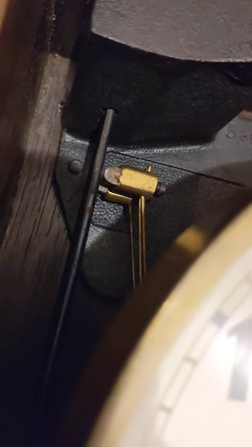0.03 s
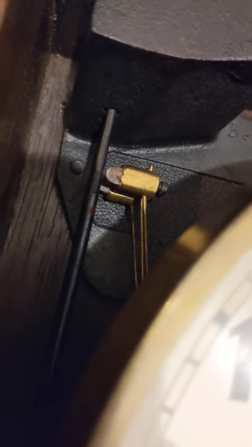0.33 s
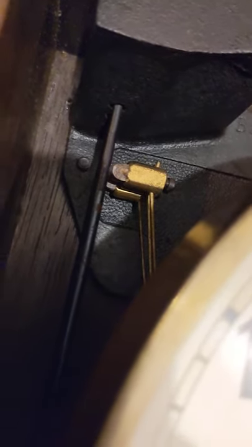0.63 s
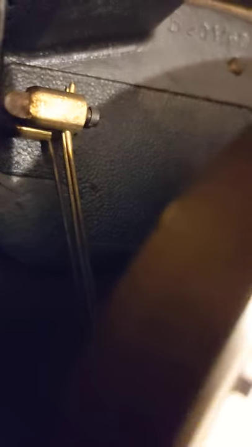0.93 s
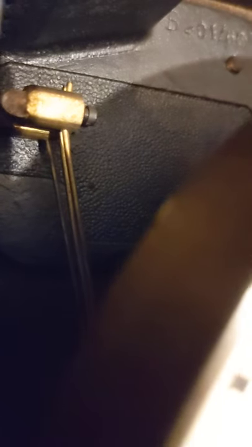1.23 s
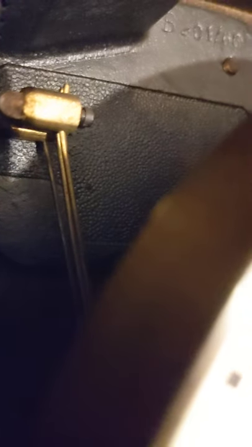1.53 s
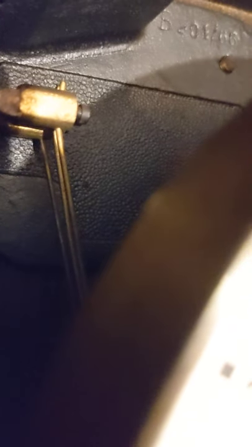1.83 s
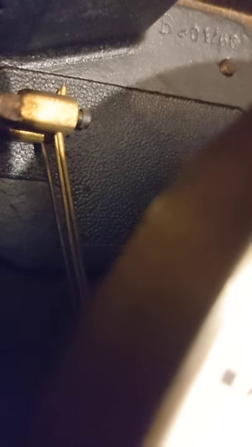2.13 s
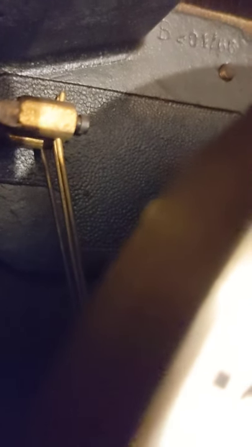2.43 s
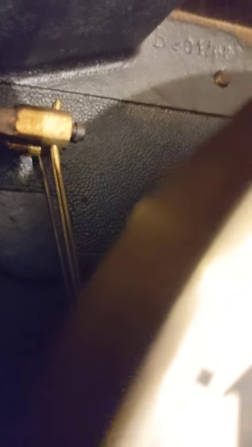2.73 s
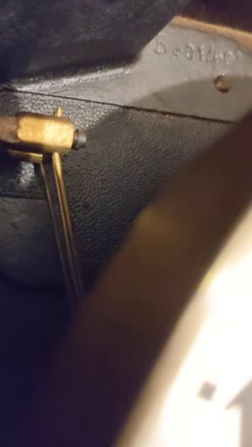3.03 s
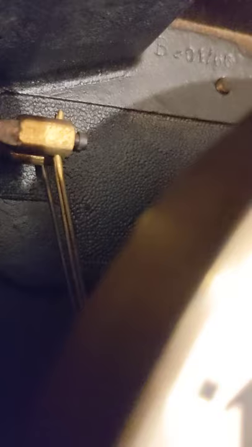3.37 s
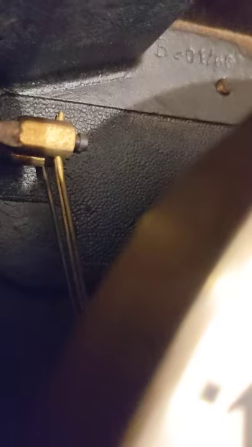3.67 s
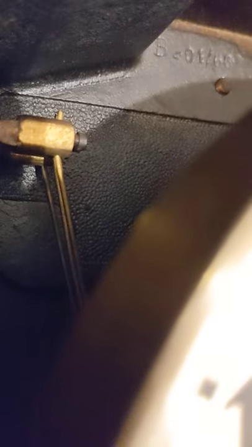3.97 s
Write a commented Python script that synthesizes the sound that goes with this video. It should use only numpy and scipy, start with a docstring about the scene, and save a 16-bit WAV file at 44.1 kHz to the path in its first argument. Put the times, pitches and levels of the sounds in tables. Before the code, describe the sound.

A pendulum clock ticks about twice a second, heard close inside its wooden case in a quiet room, each beat woody with a faint metallic ring. Handling adds a click and a low bump at about 1.7 seconds, then soft scrapes, small clicks and knocks from 2.3 to 3.2 seconds. From 3.7 seconds to the end at 4 comes the loudest cluster of sharp clicks and hollow knocks.

```python
"""A pendulum clock ticks twice a second, heard from close up inside its wooden case in a quiet room.
Each beat of the escapement is two or three quick strikes that ring the case, the metal movement
and, faintly, the chime rods. Handling adds soft scrapes, a low rumble, humming bumps, sharp clicks
and hollow knocks, loudest near the end."""
import sys
import numpy as np
from scipy import signal
from scipy.fft import rfft, irfft
from scipy.io import wavfile

SR = 44100
rng = np.random.default_rng(int(sys.argv[2]) if len(sys.argv) > 2 else 0)


def transcribe(signal):
    """Save signal, clipped to [-1, 1], as a 16-bit WAV file at the path in sys.argv[1]."""
    frames = np.atleast_2d(signal).T
    limited = np.clip(frames, -1, 1)
    pcm = np.round(limited * 32767).astype(np.int16)
    wavfile.write(sys.argv[1], SR, pcm)


N = 176400
CASE_RISE_S, STRIKE_RISE_S, CLICK_RISE_S = 0.0039, 0.00069, 0.00091
# Decay of a clicked or scraped part. Each row: frequency in Hz, t60 in seconds.
PART_T60 = [(80, 0.13), (400, 0.39), (1000, 0.12), (4000, 0.083), (14000, 0.068)]


def amp(db):
    """Decibels to gain."""
    return 10 ** (np.asarray(db) / 20)


def unit(x):
    """Scales to an rms of one."""
    return x / np.sqrt(np.mean(x ** 2) + 1e-20)


def curve_at(points, hz):
    """Reads a curve on a log-frequency axis."""
    f, value = np.transpose(points)
    return np.interp(np.log(hz + 1), np.log(f + 1), value)


def add(mix, start_s, sound):
    """Mixes a sound in at a time; one that starts before zero leaves only its tail."""
    start = round(start_s * SR)
    sound = sound[:, max(-start, 0):]
    part = mix[:, max(start, 0):][:, :sound.shape[1]]
    part += sound[:, :part.shape[1]]


def colour(x, points):
    """Equalises along a curve of (Hz, dB) points."""
    size = x.shape[-1]
    return irfft(rfft(x) * amp(curve_at(points, np.fft.rfftfreq(size, 1 / SR))), size)


def stereo_noise(size):
    """White noise, nearly centred in the bass and wide above it."""
    # Stereo width. Each row: frequency in Hz, left-right correlation.
    likeness = [(80, 0.82), (300, 0.69), (700, -.2), (1500, 0.04)]
    # Stereo balance. Each row: frequency in Hz, left minus right in dB.
    balance = [(100, -0.5), (1400, 1.5), (9000, -1.5), (14000, -3.5)]
    hz = np.fft.rfftfreq(size, 1 / SR)
    left, unrelated = rfft(rng.standard_normal((2, size)))
    same, tilt = curve_at(likeness, hz), amp(curve_at(balance, hz) / 2)
    right = same * left + np.sqrt(1 - same ** 2) * unrelated
    return irfft(np.array([left * tilt, right / tilt]), size)


def decay(t, t60):
    """An envelope that falls 60 dB in t60 seconds."""
    return np.exp(-np.log(1000) * t / t60)


def die_away(x, t60_curve, rise_s, stretch=1):
    """A quick rise, then each band decays at its own speed."""
    size = x.shape[-1]
    hz, t, bands = signal.stft(x, SR, nperseg=256)
    bands = bands * decay(t, stretch * curve_at(t60_curve, hz)[:, None])
    attack = 1 - np.exp(-(np.arange(size) / SR / rise_s) ** 2)
    return signal.istft(bands, SR, nperseg=256)[1][:, :size] * attack


def ring(modes, rise_s, scale=1):
    """Decaying modes of alternating sign, each with its own level and phase left and right."""
    t, side = np.arange(SR // 2) / SR, np.array([[.5], [-.5]])
    out = np.zeros((2, len(t)))
    for k, (hz, db, t60, pan_db, lead) in enumerate(modes):
        tone = np.sin(2 * np.pi * hz * scale * t + side * lead)
        out += (-1) ** k * amp(db + side * pan_db) * decay(t, t60) * tone
    return out * (1 - np.exp(-t / rise_s))


def dense_modes(ripple_db=3, width_hz=100, full_above_hz=3150):
    """Rippled noise as a thicket of close modes; in the treble some stand out above the rest."""
    spectrum, hz = rfft(stereo_noise(SR // 2)), np.fft.rfftfreq(SR // 2, 1 / SR)
    ripple = np.interp(hz / width_hz, np.arange(len(hz)), rng.standard_normal(len(hz)))
    return irfft(spectrum * amp(ripple_db * ripple * np.minimum(hz / full_above_hz, 1)))


def room_hush(level_db=-69):
    """The steady, bass-heavy air of a quiet room."""
    # Room tone. Each row: frequency in Hz, gain in dB.
    tone = [(15, -47), (25, -31), (40, -14), (64, -4), (200, -13.5), (641, -17), (16000, -35)]
    return amp(level_db) * unit(colour(stereo_noise(N), tone))


def room_echo(near, level_db=-19):
    """The room answers with a short, diffuse tail."""
    # Room decay. Each row: frequency in Hz, t60 in seconds.
    room_t60 = [(200, 0.12), (2000, 0.33), (14000, 0.24)]
    tail = die_away(rng.standard_normal((2, SR // 2)), room_t60, rise_s=0.007)
    return amp(level_db) * signal.fftconvolve(near, tail / np.linalg.norm(tail[0]), axes=1)[:, :N]


def handling(trim_db=-1):
    """Low rumble and dull rustle of the moving hand."""
    # Fader moves of the two layers. Each row: time in seconds, level before the trim in dB.
    rumble_fader = [(0, -73.5), (.7, -77), (.83, -58.5), (1.1, -70.5), (1.67, -77), (1.7, -51.5),
                    (1.9, -62), (2.2, -75.5), (2.55, -52.5), (2.9, -59.5), (3.6, -70), (4, -55.5)]
    rustle_fader = [(0, -77), (.7, -97), (.83, -61.5), (1.0, -87), (1.6, -77.5), (1.7, -47.5), (1.8, -72.5),
                    (1.93, -59), (2.02, -69), (2.45, -61.5), (2.53, -46.5), (2.67, -48.5), (2.77, -57),
                    (2.88, -63.5), (2.96, -51), (3.15, -53.5), (3.36, -75.5), (3.68, -65.5), (3.76, -47),
                    (4, -72)]
    # Their tone. Each row: frequency in Hz, gain in dB.
    rumble_tone = [(40, -29), (58, -4), (78, 5), (200, -13), (600, -61)]
    rustle_tone = [(60, -39), (125, -3.5), (370, 2.5), (1000, -11), (2500, -24), (8000, -46)]
    out, t = np.zeros((2, N)), np.arange(N) / SR
    for fader, tone in [(rumble_fader, rumble_tone), (rustle_fader, rustle_tone)]:
        level_db = np.interp(t, *np.transpose(fader)) + trim_db
        out += amp(level_db) * unit(colour(stereo_noise(N), tone))
    return out


def bumps():
    """Each bump sets one part humming: the case booms low, a rod hangs on."""
    # Each row: start in seconds, level in dB, pitch in Hz, t60 in seconds.
    hums = [(1.686, -41, 75, 0.34), (1.687, -41, 106, 0.11), (2.29, -57.5, 124, 2.6),
            (2.471, -46, 165.3, 0.93), (3.17, -61, 4235, 0.33), (3.735, -43, 394.7, 0.43)]
    out, t = np.zeros((2, N)), np.arange(2 * SR) / SR
    attack = 1 - np.exp(-t / CASE_RISE_S)
    for start, db, hz, t60 in hums:
        hum = attack * decay(t, t60) * np.sin(2 * np.pi * hz * t)
        add(out, start, amp(db) * hum[None])
    return out


def scrapes(slips_per_s=900, slip_spread_db=3, hiss=0.38, depth_db=22.5, bands_hz=(3100, 4800)):
    """Short rubs: dense tiny slips over a hiss excite a ringing part, swell, hold and fade."""
    # Each row: start, swell, hold and fade in seconds, then middle and treble gain in dB.
    strokes = [(0.736, 0.012, 0.019, 0.088, -64.5, -65), (1.691, 0.0092, 0.023, 0.038, -45.5, -58),
               (2.279, 0.0061, 0.017, 0.021, -54, -56.5), (2.471, 0.0046, 0.021, 0.028, -46.5, -51.5),
               (2.478, 0.039, 0.049, 0.17, -36, -42.5), (2.643, 0.039, 0.018, 0.024, -41.5, -52),
               (2.892, 0.067, 0.0074, 0.083, -58, -55.5), (3.134, 0.04, 0.008, 0.02, -39, -45),
               (3.588, 0.022, 0.094, 0.052, -63.5, -61.5), (3.736, 0.049, 0.039, 0.14, -45.5, -56)]
    # Tone of every rub. Each row: frequency in Hz, gain in dB.
    tone = [(100, -25), (400, -5.5), (800, 4.5), (2400, -3.5), (7500, 3), (9500, -11), (16000, -12.5)]
    # Resonances that sing under a rub. Each row: centre in Hz, width in Hz, boost in dB.
    resonances = [(3600, 80, 8), (9500, 160, 6.5)]
    out, t = np.zeros((2, N)), np.arange(SR // 2) / SR
    hz = np.fft.rfftfreq(len(t), 1 / SR)
    part_response = rfft(die_away(dense_modes(), PART_T60, CLICK_RISE_S, stretch=0.6))
    for centre_hz, width_hz, db in resonances:
        part_response *= 1 + (amp(db) - 1) / (1 + 2j * (hz - centre_hz) / width_hz)
    for start, swell, hold, fade, *band_db in strokes:
        strength = amp(slip_spread_db * np.minimum(rng.exponential(1, len(t)), 4))
        slips = strength * (rng.random(len(t)) < slips_per_s / SR)
        friction = (unit(slips) + hiss) * rng.standard_normal(len(t))
        rub = unit(colour(irfft(part_response * rfft(friction)), tone))
        rub = colour(rub, list(zip(bands_hz, band_db)))
        below_peak = np.maximum(1 - t / swell, 0) + np.maximum(t - swell - hold, 0) / fade
        add(out, start, rub * amp(-depth_db * below_peak))
    return out


def knocks():
    """Blunt knocks ring the hollow of the case."""
    # Each row: start in seconds, level in dB, pitch in Hz.
    hits = [(2.268, -42.5, 705), (2.522, -39, 803), (3.831, -24.5, 819), (3.861, -24, 810),
            (3.945, -30, 819)]
    # Modes of the hollow. Each row: ratio to the pitch, gain in dB, t60 in seconds,
    # left minus right in dB, left phase lead in radians.
    hollow = [(.575, -17, 0.12, 8, 0.5), (.742, -11.5, 0.088, -3, -2), (.985, 6.5, 0.19, -2, 2.5),
              (1.06, -2.5, 0.092, 0, -1), (1.14, 1, 0.067, 4.5, -1.5), (1.34, -7.5, 0.15, -1, 4),
              (.84, -7.5, 0.24, 10, 2.5)]
    out = np.zeros((2, N))
    for start, db, hz in hits:
        add(out, start, amp(db) * ring(hollow, STRIKE_RISE_S, scale=hz))
    return out


def clicks():
    """Hard parts snap against each other; the treble dies first."""
    # Each row: start in seconds, bass, middle, upper and treble gain in dB, decay stretch factor.
    snaps = [(1.681, -18, -22.5, -24, -34, 0.35), (1.882, -28.5, -53, -52, -54.5, 0.6),
             (2.635, -29, -39, -40, -46, 0.6), (2.656, -17, -26.5, -53, -42.5, 0.55),
             (2.669, -20, -38, -30.5, -53, 0.34), (2.944, -19.5, -40, -39, -52, 0.91),
             (3.009, -18.5, -34.5, -40, -56, 0.47), (3.17, -50, -40.5, -37, -59, 1),
             (3.719, -33, -23.5, -18.5, -31, 0.88), (3.729, -19, -17.5, -23, -23.5, 0.76),
             (3.778, -42, -36, -29.5, -40.5, 0.65), (3.830, -14, -13, -12.5, -15, 0.98),
             (3.854, -33, -22.5, -27, -37.5, 1.36), (3.945, -24, -23.5, -33, -29.5, 0.86)]
    # Where those four gains sit, in Hz.
    bands_hz = (300, 1500, 4000, 12000)
    # Tone of every click. Each row: frequency in Hz, gain in dB.
    tone = [(40, -47), (150, -15), (500, 4), (850, 4.5), (2200, 6), (2700, 2), (3300, 9), (5500, 3.5),
            (9500, 0.5), (14500, 2.5)]
    out = np.zeros((2, N))
    for start, *band_db, stretch in snaps:
        snap = unit(colour(dense_modes(), tone))
        snap = colour(snap, list(zip(bands_hz, band_db)))
        add(out, start, die_away(snap, PART_T60, CLICK_RISE_S, stretch))
    return out


def case_ring(pallet):
    """The woody body of a strike: the low modes of case and movement."""
    # Each row: frequency in Hz, gain in dB, t60 in seconds, left minus right in dB,
    # left phase lead in radians, extra gain on the tock in dB.
    modes = [(287, -20, 0.32, 1.5, 0, 6), (555, -16, 0.14, -7, 3, -20.5),
             (760.7, -4.5, 0.073, 12.5, 1.17, 0), (801.6, 0.5, 0.093, -8.5, -1, 0),
             (945.6, -8, 0.14, 14, -3, -5.5), (1019, -13.5, 0.12, 2.5, 3.5, 6.5),
             (1330, 2, 0.045, 4.5, -2, 0), (1473.4, -0.5, 0.032, 19.5, 2.5, 4.5),
             (1544, -2.5, 0.065, 8.5, 0.36, 5.5), (1597, 3, 0.075, 8, 5.5, 1.5),
             (1830, -3, 0.073, -8.5, 1.1, 1), (1947, 0.5, 0.033, -21, -2.5, -8),
             (2206, 2.5, 0.044, 11, 0.5, -5), (2267, 3.5, 0.045, -9, 0.25, -3.5)]
    return ring([(hz, db + pallet * tock_db, *rest) for hz, db, *rest, tock_db in modes], CASE_RISE_S)


def wheel_ring(pallet, t60=0.084):
    """The bright ping of pallets and escape wheel, weighted by which pallet lands."""
    # Each row: frequency in Hz, tick gain in dB, tock gain in dB.
    pings = [(3332, -28, -10), (3550, -23.5, -7.5), (3700, -12.5, -15), (4195, -31, -8), (4250, -24, -11.5),
             (4680, -18, -17), (5380, -13, -41), (6620, -12.5, -33), (8670, -33.5, -24.5),
             (10190, -29.5, -48), (13900, -39, -23)]
    modes = [(hz, tick + pallet * (tock - tick), t60, 0, rng.uniform(-np.pi, np.pi))
             for hz, tick, tock in pings]
    return ring(modes, STRIKE_RISE_S)


def clatter(movement, pallet, same_share=0.6):
    """The dense upper modes of the movement, partly the same on every strike and partly fresh."""
    # Basic tone, and the colour a tock adds to it. Each row: frequency in Hz, gain in dB.
    tone = [(100, -17), (1500, -3.5), (2250, 1), (2600, -12), (4400, -2), (5000, -15.5), (6600, -3),
            (7500, -5.5), (12000, -19), (14000, -21), (16000, -29)]
    tock_tone = [(6400, 3), (9000, -27.5), (14000, 16)]
    # Decay of the metal. Each row: frequency in Hz, t60 in seconds.
    metal_t60 = [(200, 0.42), (1000, 0.13), (4000, 0.12), (7000, 0.065), (14000, 0.041)]
    metal = np.sqrt(same_share) * movement + np.sqrt(1 - same_share) * stereo_noise(SR // 2)
    metal = colour(metal, tone)
    metal = unit(colour(metal, [(hz, pallet * db) for hz, db in tock_tone]))
    return die_away(metal, metal_t60, STRIKE_RISE_S)


def escapement(beat_gap_s=0.1):
    """Every strike rings the case and the movement, the first of a beat also the chime rods."""
    # Each row: start in seconds, case level in dB, metal level in dB, pallet from 0 (tick) to 1 (tock).
    strikes = [(-.17, -31, -34, 0), (.368, -41, -38, 0.94), (.379, -39, -38, 0.7),
               (1.1127, -30.5, -32.5, 0.22), (1.126, -35.5, -38, 0.38), (1.138, -33.5, -34.5, 0.15),
               (1.6113, -36.5, -35, 0.91), (1.622, -35.5, -35.5, 0.64), (2.077, -28.5, -30.5, 0.18),
               (2.090, -32, -27.5, 0), (2.099, -34, -60, 0.3), (2.568, -33.5, -33, 0.68),
               (2.582, -36, -38, 0.32), (3.045, -30.5, -32.5, 0.35), (3.061, -39.5, -39, 0.29),
               (3.069, -35.5, -38.5, 0.12), (3.538, -39.5, -34, 0.79), (3.55, -34, -38.5, 1)]
    # Chime rods ringing in sympathy. Each row: pitch in Hz, tick and tock gain in dB
    # relative to the case level, t60 in seconds.
    rods = [(1583, -35, -32, 0.9), (1614, -22.5, -24, 0.57), (4230, -35.5, -24, 0.58)]
    out, t = np.zeros((2, N)), np.arange(2 * SR) / SR
    movement = dense_modes()
    rod_tones = [decay(t, t60) * np.sin(2 * np.pi * (hz * t + rng.random((2, 1)) / 2))
                 for hz, _, _, t60 in rods]
    gaps = np.diff([row[0] for row in strikes], prepend=-np.inf)
    for (start, case_db, metal_db, pallet), gap in zip(strikes, gaps):
        rattle = amp(-3) * clatter(movement, pallet)
        # Two pings in random phase, so each mode's strength varies from strike to strike.
        ping = wheel_ring(pallet) + amp(-1.5) * wheel_ring(pallet)
        add(out, start, amp(case_db) * case_ring(pallet) + amp(metal_db) * (ping + rattle))
        if gap > beat_gap_s:
            for rod_tone, (_, tick, tock, _) in zip(rod_tones, rods):
                add(out, start, amp(case_db + tick + pallet * (tock - tick)) * rod_tone)
    return out


def scene():
    """Clock and handling, with a faint room echo and the room's hush."""
    near = escapement() + clicks() + knocks() + scrapes()
    return near + room_echo(near) + handling() + bumps() + room_hush()


def record(dry):
    """A steep low-pass takes off the very top."""
    low_pass = signal.firwin(511, cutoff=16450, window=("kaiser", 9), fs=SR)
    return signal.oaconvolve(dry, low_pass[None], "same")


dry = scene()
out = record(dry)
transcribe(out)
```